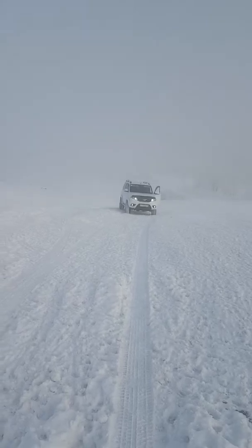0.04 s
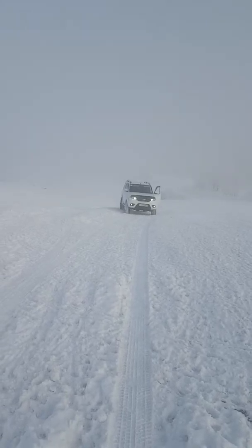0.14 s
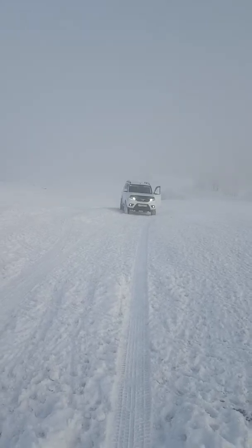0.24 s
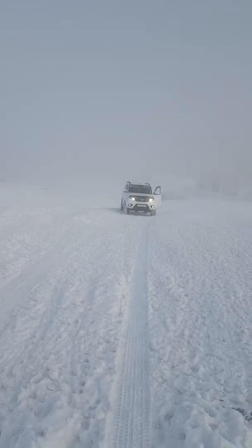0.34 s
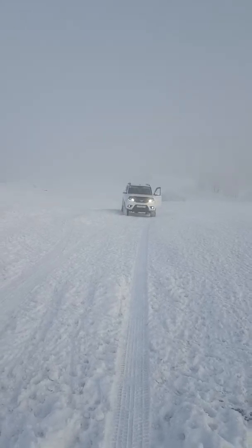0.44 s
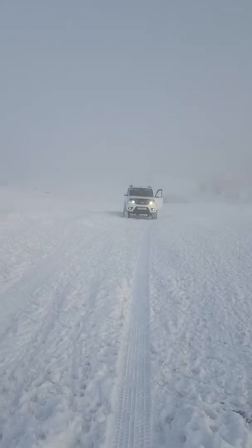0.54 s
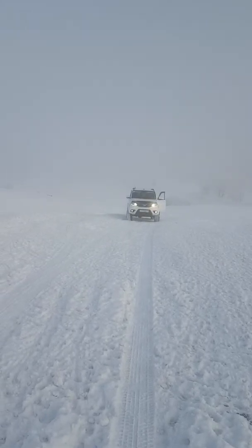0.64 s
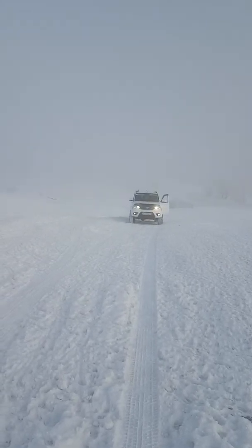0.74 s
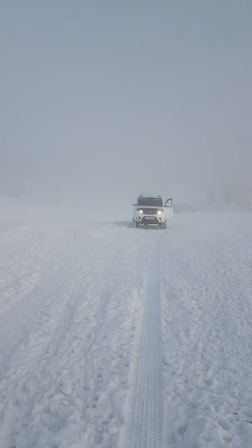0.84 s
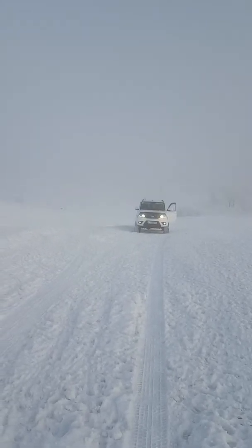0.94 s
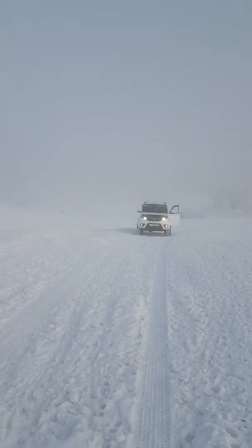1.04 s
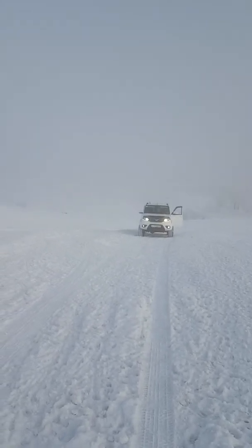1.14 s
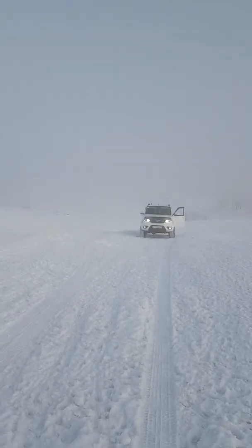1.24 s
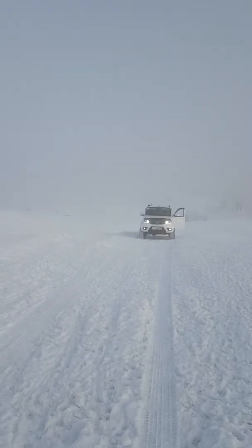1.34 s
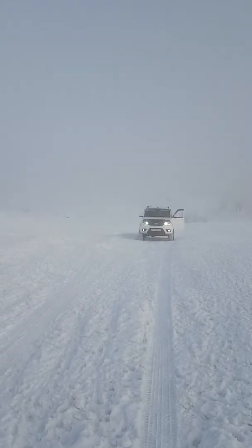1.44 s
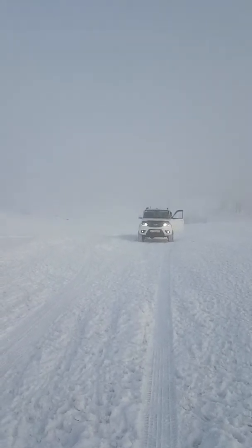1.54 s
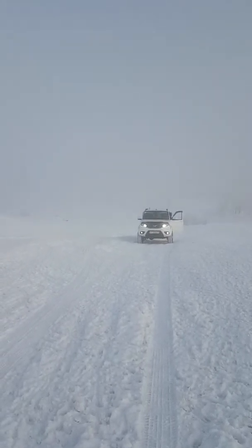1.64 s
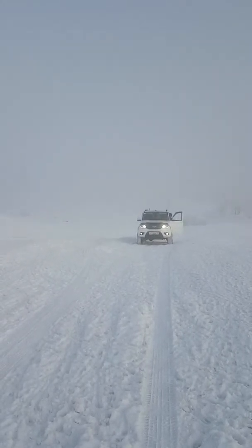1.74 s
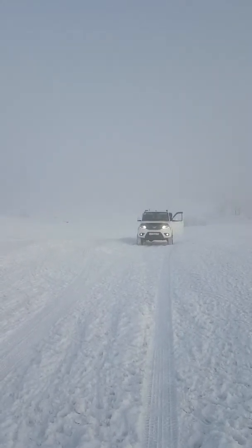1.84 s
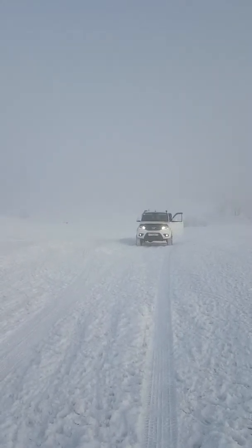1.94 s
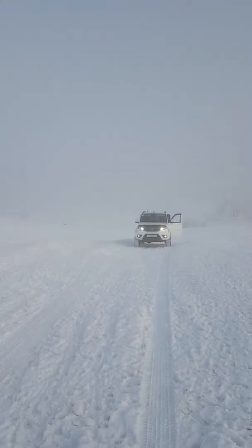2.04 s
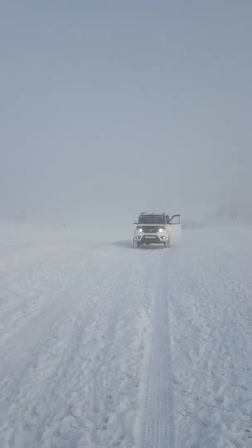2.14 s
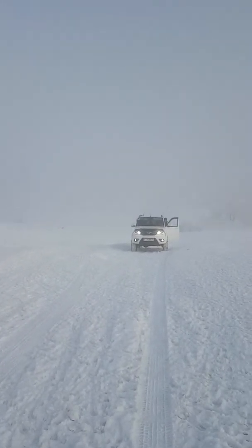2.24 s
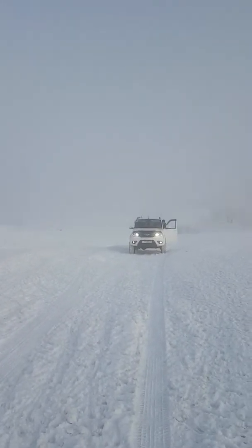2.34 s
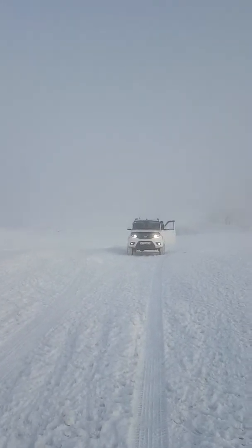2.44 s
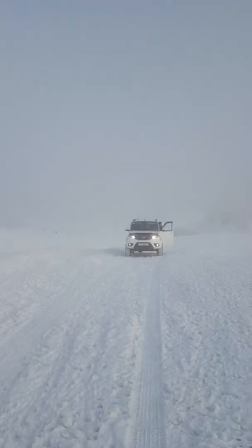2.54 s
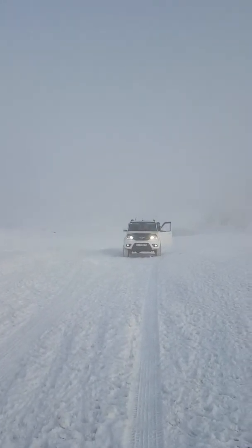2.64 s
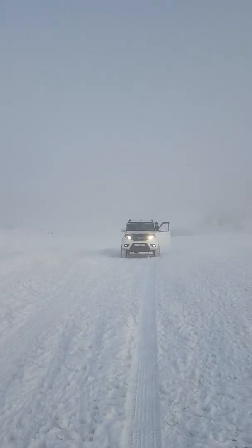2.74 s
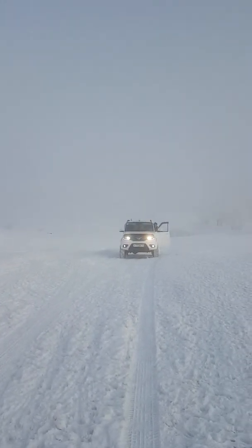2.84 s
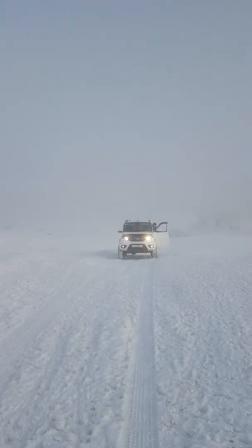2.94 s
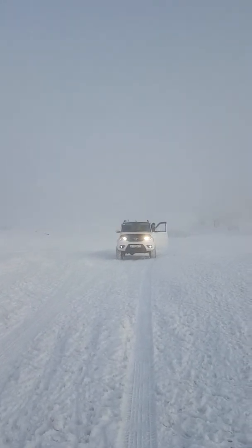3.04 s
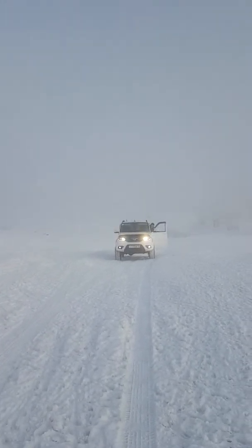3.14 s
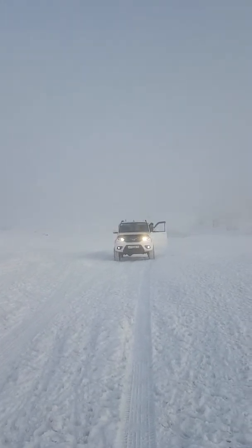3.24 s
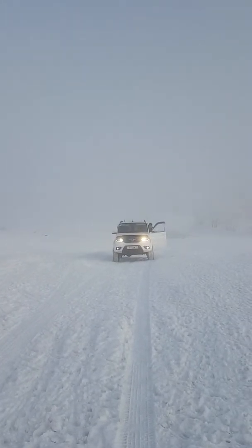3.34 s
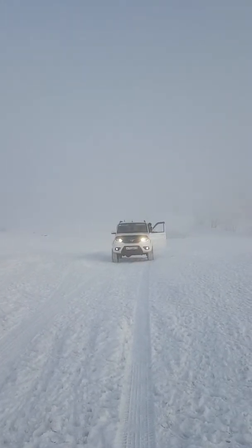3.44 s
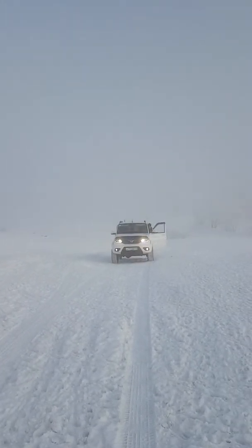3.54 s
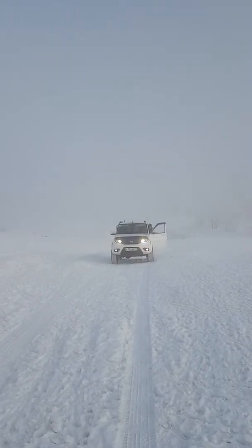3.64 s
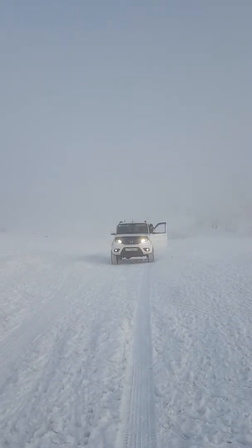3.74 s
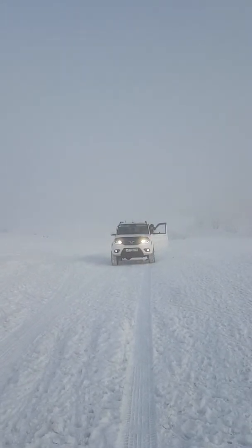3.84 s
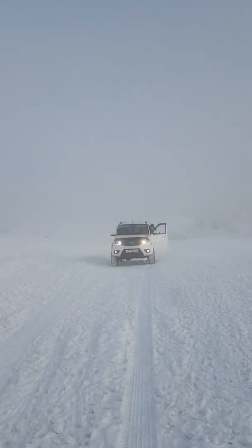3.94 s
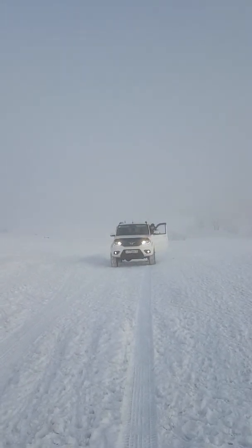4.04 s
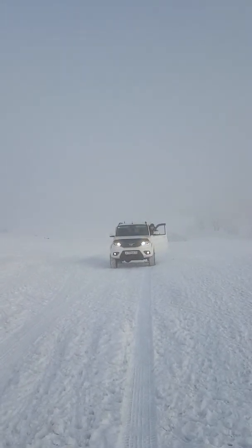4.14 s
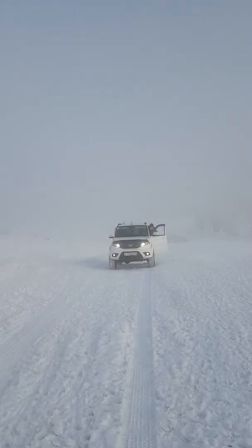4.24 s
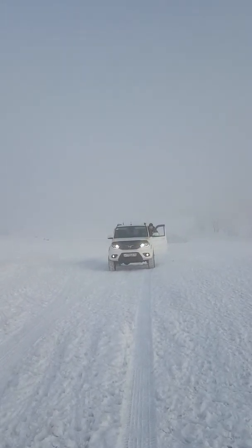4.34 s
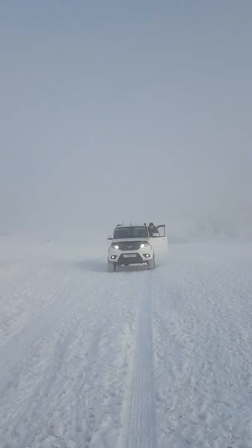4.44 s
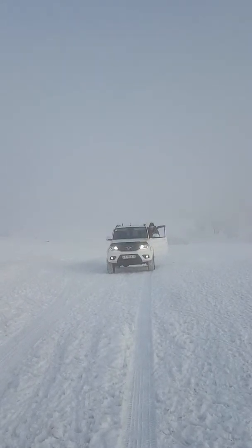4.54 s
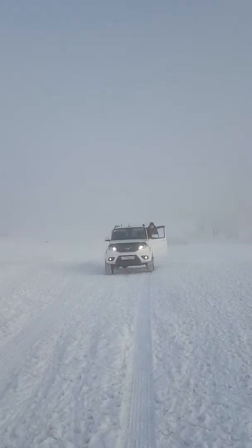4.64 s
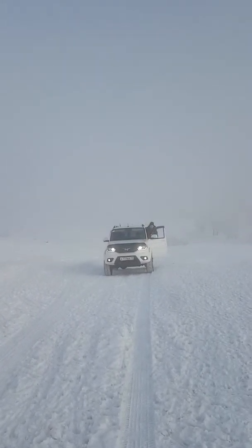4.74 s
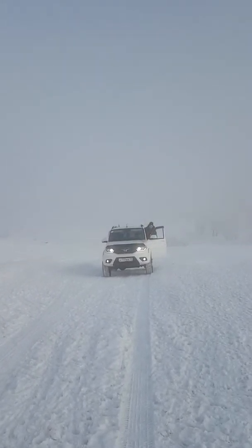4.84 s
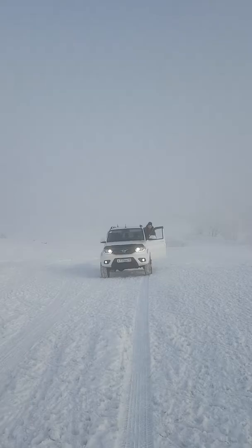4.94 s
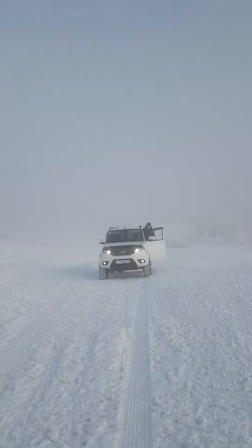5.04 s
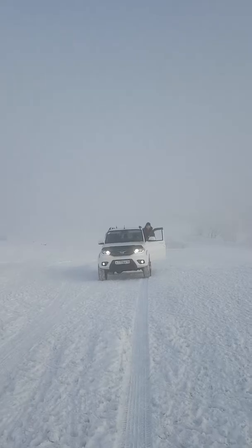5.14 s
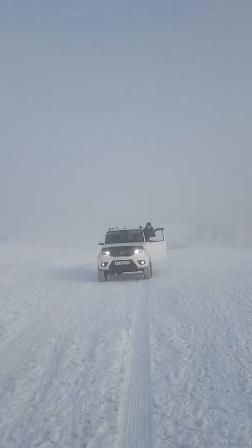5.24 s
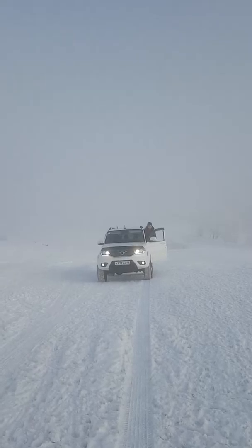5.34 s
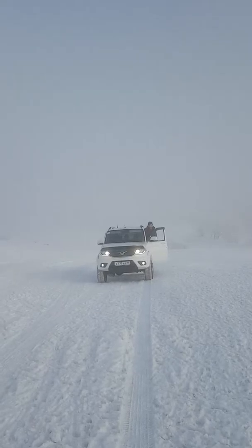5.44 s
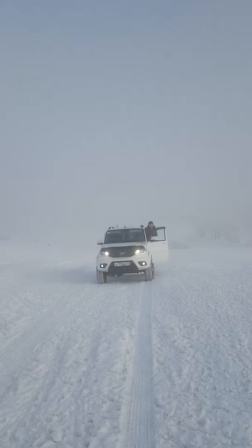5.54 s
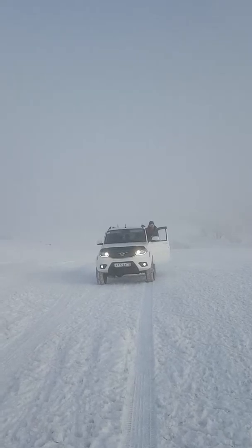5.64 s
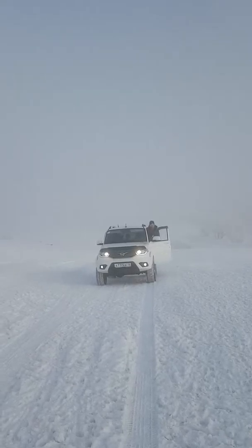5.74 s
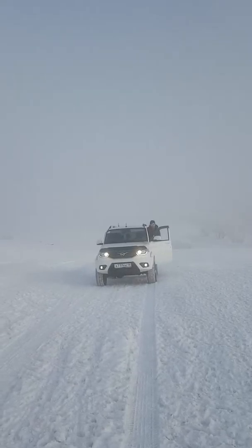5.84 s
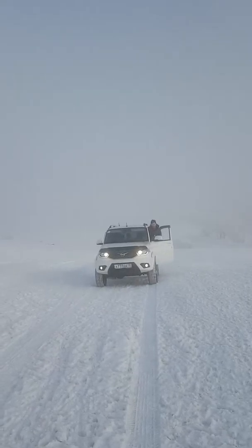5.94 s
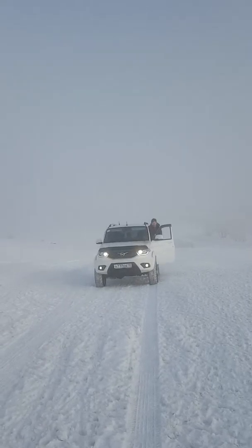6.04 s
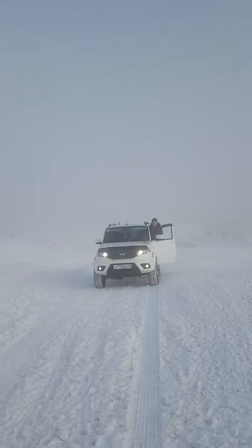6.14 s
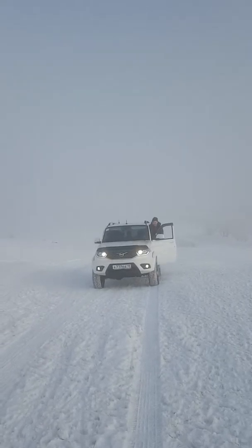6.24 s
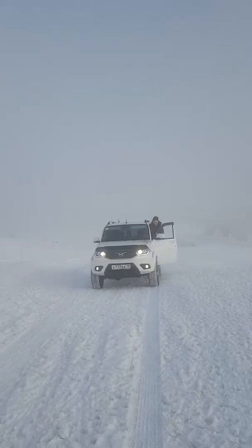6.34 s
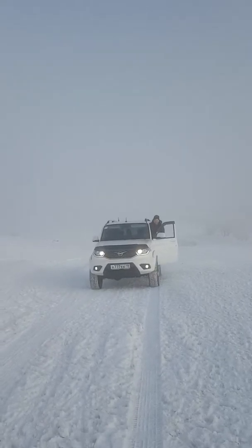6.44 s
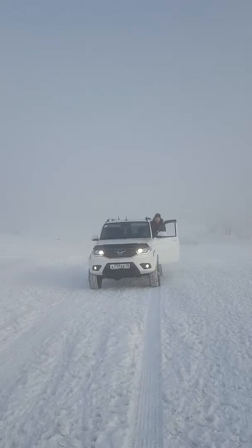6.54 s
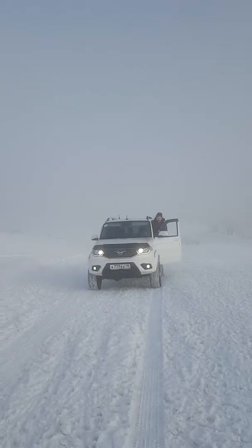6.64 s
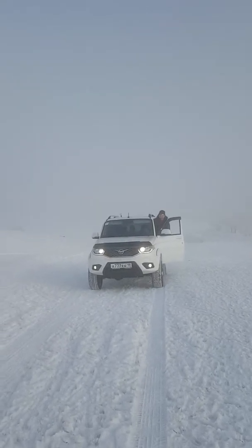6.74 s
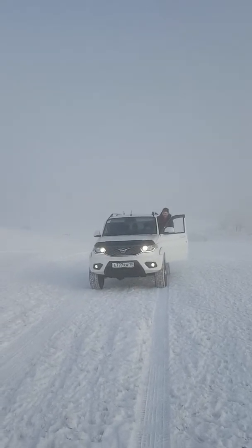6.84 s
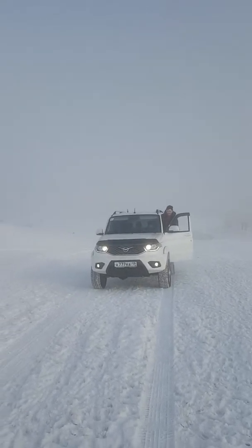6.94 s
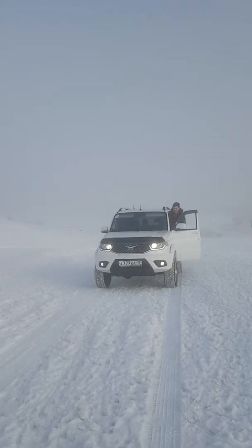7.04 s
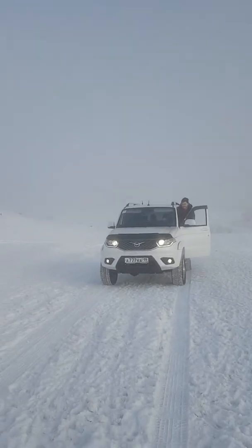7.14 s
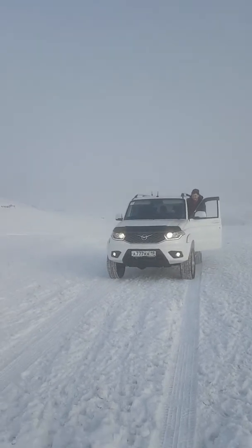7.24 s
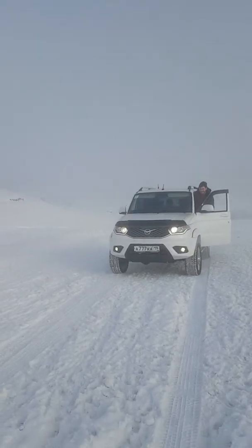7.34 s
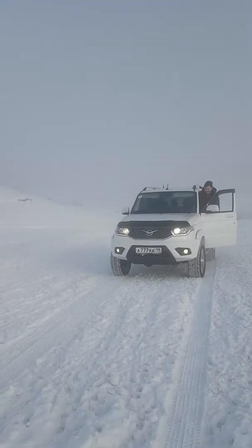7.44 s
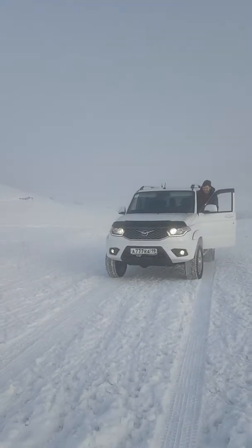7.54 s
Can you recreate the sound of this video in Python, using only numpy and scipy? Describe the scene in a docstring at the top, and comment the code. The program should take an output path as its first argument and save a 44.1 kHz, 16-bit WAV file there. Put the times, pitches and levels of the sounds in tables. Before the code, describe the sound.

Outdoors on an open snowy plain, a distant SUV approaches with a low, pulsing engine hum. The note sags for two seconds, jumps up, then climbs in steps. Tyres thud dully and rumble over packed snow; crunches and short squeaks grow clearer. Close to the microphone come soft rustles and a few small ticks, mostly at the beginning and end. Dry, with no echo.

```python
"""A frozen, snow-covered plain: an SUV crawls closer, its four-cylinder engine dipping, then slowly revving up.
The engine is a set of sine waves locked to the firing rate; fan, valves and belt are shaped noise.
The tyres rumble and crunch in surges, made from random grains of sound, with short squeaks of noise.
Everything from the vehicle's engine bay grows clearer as it nears. Close by, there are rustles and ticks."""
import sys
import numpy as np
from scipy import signal
from scipy.fft import rfft, irfft
from scipy.io import wavfile
from scipy.ndimage import uniform_filter1d, map_coordinates

SR = 44100
rng = np.random.default_rng(int(sys.argv[2]) if len(sys.argv) > 2 else 0)


def to_wav(s):
    """Save 16-bit WAV."""
    ch = np.atleast_2d(s).T  # columns
    pcm = np.round(np.clip(ch, -1, 1) * 32767)  # PCM
    wavfile.write(sys.argv[1], SR, pcm.astype(np.int16))


N = 334410

# In every table of swells, spread_s is the time from the peak until the gain has sunk to 0.61 of it.
# In every spectrum, level_db only sets the balance between pitches; loudness is set elsewhere.

# Left minus right level of the spread-out noises: pitch_hz, difference_db
STEREO_TILT = [(60, -1.1), (250, -1.9), (500, 1), (1000, 1), (1250, 2), (1500, -3), (1850, 0), (2250, -8.5),
               (2700, -7), (3200, -5), (4300, -8), (6200, -4.5), (9000, 0), (15000, 4)]
# How alike left and right are, from 0 (unrelated) to 1 (the same): pitch_hz, likeness
STEREO_LIKENESS = [(150, .999), (300, 0.92), (600, 0.89), (1200, 0.81), (1900, 0.53), (2400, 0.9),
                   (3300, 0.097), (4500, 0.0), (7000, 0.0), (15000, 0.0092)]

# Small sharp ticks nearby, before left-right balance: start_s, level_db, pitch_hz, width_hz
NEARBY_TICKS = [(0.049, -24.5, 1630, 1600), (.261, -48, 3600, 200), (0.822, -27, 1680, 1800),
                (5.867, -36, 15020, 2523), (6.617, -35, 5016, 5028)]
# Something rustles close by, before left-right balance: peak_s, spread_s, thin_hiss_db, gritty_body_db
NEARBY_RUSTLES = [(0.03, 0.062, -71, -51), (0.17, 0.06, -73, -51.5), (0.37, 0.14, -76, -54.5),
                  (0.77, 0.18, -70.5, -50.5), (1.18, 0.13, -75, -58.5), (6.61, 0.027, -63.5, -44),
                  (6.83, 0.068, -56.5, -46), (6.97, 0.098, -56, -47.5), (7.29, .03, -58, -51),
                  (7.39, .035, -60.5, -53), (7.52, .05, -62, -53)]
# Spectrum of the thin rustle and the even hiss: pitch_hz, level_db
RUSTLE_SPECTRUM = [(2000, -26), (7500, 8.5), (9200, -3.5), (11000, 1), (12500, 7), (15700, 7.5)]
# Spectrum of the gritty body of a rustle: pitch_hz, level_db
GRIT_SPECTRUM = [(250, -3), (450, 0), (650, 0), (850, -3.5), (1080, -1.5), (1320, -10.5), (1620, -0.5),
                 (2000, -6), (2500, -11.5), (3500, -14.5), (7000, -20.5), (9500, -33)]

# Faint airy whistle from the vehicle, before left-right balance: time_s, pitch_hz, level_db
WHISTLE_PATH = [(1.15, 7500, -87), (1.22, 7480, -73), (1.4, 7440, -79), (2.3, 7430, -85.5),
                (3.5, 7200, -92), (4.4, 7300, -84.5), (5, 7930, -84), (6.5, 7898, -86)]
# The wheels slip and throw powder: peak_s, spread_s, level_db
WHEEL_SLIP = (2.33, 0.38, -63)
# Spectrum of the thrown powder: pitch_hz, level_db
POWDER_SPECTRUM = [(2000, -2.5), (3000, 3.5), (3600, 2.5), (4800, -2), (6200, -4), (7800, -7), (9000, -20),
                   (12000, -14)]
# Cold snow squeaks under a tyre, before left-right balance: peak_s, level_db, middle_pitch_hz, fall_hz_per_s
SNOW_SQUEAKS = [(2.73, -57.5, 1470, 2990), (3.70, -56, 1080, 700), (3.76, -57, 1480, 700),
                (4.32, -52.5, 1450, 700), (4.53, -57, 1400, 700.4), (5.19, -60, 1510, 700),
                (6.61, -49.5, 1560, 697), (6.71, -47, 1500, 700)]
# Patches of hard crust give way: peak_s, spread_s, level_db
CRUST_BREAKS = [(5.13, 0.044, -60), (7.09, 0.065, -49), (7.25, 0.054, -39.5), (7.53, 0.034, -46)]
# Spectrum of a breaking patch: pitch_hz, level_db
BREAK_SPECTRUM = [(700, -21), (1300, -1), (2100, 5.5), (2850, -15), (3650, -3.5), (4700, -13.5),
                  (6300, -10), (7800, -18), (10000, -34)]

# Steady bed of sound under the tyres: time_s, thud_db, rumble_db
SNOW_BED = [(0.0, -43, -43), (0.45, -41, -43.5), (0.8, -39.5, -42.5), (0.95, -42, -36.5),
            (2.1, -38.5, -36.5), (2.4, -39, -42), (3.3, -54, -35.5), (3.43, -55, -50.5), (3.6, -46, -42),
            (4.7, -61, -38), (7.58, -60, -34.5)]
# A wheel drops through the packed snow: peak_s, spread_s, thud_db, rumble_db
WHEEL_JOLTS = [(0.115, 0.023, -31.5, -40), (0.5, 0.022, -41, -39.5), (0.97, 0.096, -50, -44),
               (1.39, 0.04, -40, -36), (2.24, 0.039, -29, -45), (2.5, 0.031, -32, -38),
               (2.67, 0.033, -35, -35.5), (2.85, 0.079, -31, -40), (3.06, 0.041, -52, -34),
               (3.24, .045, -51, -47), (3.56, 0.057, -45, -35), (3.72, .04, -36.5, -38),
               (3.87, 0.062, -39, -35.5), (4.21, .025, -52, -33), (4.36, 0.058, -37.5, -32),
               (4.59, 0.035, -54, -38), (5.11, 0.05, -33.5, -36), (5.22, 0.051, -38.5, -31.5),
               (5.6, 0.069, -58, -36), (6.12, 0.036, -39, -36), (6.6, .04, -37, -33.5),
               (6.8, .03, -34, -30.5), (6.97, 0.066, -60, -33.5)]
# The tread grinds through the crust: peak_s, spread_s, level_db
CRUNCH_SURGES = [(1.9, .06, -56.5), (2.22, .09, -55.5), (2.79, .075, -56), (3.73, 0.11, -53.5),
                 (4.32, 0.057, -51.5), (4.49, 0.18, -51.5), (5.15, .095, -48.2), (6.62, 0.086, -45),
                 (6.77, 0.12, -47.5), (7.34, 0.26, -48.5), (7.52, 0.045, -46.5)]
# Spectra of deep thud, packing rumble and crust crunch: pitch_hz, level_db
THUD_SPECTRUM = [(40, -57), (65, -13), (88, 6.5), (110, 4.5), (140, 1.5), (200, -13.5), (500, -97)]
RUMBLE_SPECTRUM = [(60, -26), (100, -12), (130, -2.5), (165, -2), (192, 2), (255, -5), (295, -10.5),
                   (350, -23), (450, -39), (2000, -100)]
CRUNCH_SPECTRUM = [(500, -26), (850, -8.5), (1100, 2.5), (1280, -4.5), (1500, 3.5), (1680, 2), (1920, -5),
                   (2850, -9.5), (5000, -27), (10000, -72)]

# Hiss of the drive belt: pitch_hz, width_hz, left_minus_right_db
BELT_HISS = (2390, 400, -6)
# The fan takes hold: middle_of_rise_s, rise_s
FAN_TAKES_HOLD = (2.77, 0.1)
# Spectra of air rush, air roar and valve clatter: pitch_hz, level_db
RUSH_SPECTRUM = [(300, -4.5), (480, -1), (610, 4), (710, -0.5), (810, -3.5), (920, -2), (1100, -12.5),
                 (1300, -17.5), (2500, -41.5)]
ROAR_SPECTRUM = [(160, -22), (260, 3.5), (310, 1), (370, 0), (450, -3), (530, -8), (700, -22), (1500, -60)]
VALVE_SPECTRUM = [(1200, -4), (1850, -2), (2150, 0.5), (2380, -1), (2650, -3), (3200, -8), (4200, -50),
                  (8000, -31.5)]

# Engine speed before smoothing: time_s, firing_rate_hz
ENGINE_SPEED = [(0.0, 50.2), (0.4, 49.38), (0.65, 45.2), (0.8, 42.3), (1.56, 40.5), (1.69, 38.53),
                (2.0, 37.41), (2.45, 54.18), (2.51, 56.06), (3.06, 52.8), (3.4, 51.4), (4.01, 53.35),
                (4.58, 61.6), (4.75, 60.7), (4.81, 58.32), (5.15, 63.3), (5.38, 61.25), (5.59, 66.1),
                (5.81, 63.36), (6.31, 66.14), (6.78, 73.23), (6.99, 75.2), (7.52, 75.2), (7.58, 75.8)]
# Weaker exhaust overtones, against their shared level: multiple_of_firing_rate, level_db
EXHAUST_OVERTONES = [(2.5, -17), (3, -8.0), (3.5, -10.5), (4, -12), (5, -19)]
# Pass band of the exhaust pipe, heard by the overtones: pitch_hz, level_db
PIPE_BAND = [(100, 10), (135, -1.5), (160, 4.5), (185, -2.5), (230, -7), (300, -6.5)]
# The driver presses or lifts the pedal: peak_s, spread_s, octave_change_db
PEDAL_MOVES = [(0.25, 0.044, -18), (2.22, 0.035, 8.5), (4.78, 0.069, -20), (5.2, 0.064, 10.5),
               (6.55, 0.28, 6)]

# In one gear, every firing moves the vehicle the same way forward
START_M, METRES_PER_FIRING = 27.78, 0.045
# Nearness and revs leave levels unchanged at this distance and firing rate
REFERENCE_M, CRUISE_HZ = 20, 55
# The flywheel smooths the speed; load is judged from the climb in firing rate over a longer span
SPEED_SMOOTHING_S, LOAD_SMOOTHING_S = 0.1, 0.2
HEAVY_LOAD_HZ_PER_S = 33  # a climb this fast gives a load of 0.76
RIGHT_LAG_S = 0.00003
CUTOFF_HZ = 15880


def from_db(db):
    """Turn decibels into gain."""
    return 10 ** (np.asarray(db) / 20)


def rms_one(x):
    """Scale to an average power of 1."""
    return x / np.sqrt(np.mean(x ** 2) + 1e-20)


def balance(left_db):
    """Left and right gains: left changes by left_db, right by the opposite."""
    return from_db([[left_db], [-left_db]])


def in_time(rows):
    """Read each column of a timed table at every sample, with straight lines between rows."""
    time_s, *columns = np.transpose(rows)
    return [np.interp(np.arange(N) / SR, time_s, column) for column in columns]


def at_bins(points):
    """Read a table at every Fourier bin, with straight lines over log frequency."""
    hz, value = np.transpose(points)
    bin_hz = np.arange(N // 2 + 1) * SR / N
    return np.interp(np.log(bin_hz + 1), np.log(hz), value)


def drift(rate_hz):
    """Random wander of average power 1, heading to a new value rate_hz times a second."""
    knots = rng.standard_normal(N // 20)
    position = np.arange(N) / SR * rate_hz + 2
    return rms_one(map_coordinates(knots, [position], order=1, mode="wrap"))


def bell(peak_s, spread_s):
    """A smooth swell of height 1 around a moment."""
    distance = (np.arange(N) / SR - peak_s) / spread_s
    return np.exp(-.5 * np.minimum(distance ** 2, 100))


def swells(rows, column=2):
    """Joint gain of a table of swells: their powers add."""
    return np.sqrt(sum((from_db(row[column]) * bell(row[0], row[1])) ** 2 for row in rows))


def grains(per_s, spread_db, smooth):
    """Two trains of random snow fractures of uneven size, over a share of smooth hiss."""
    born = rng.random((2, N)) < per_s / SR
    sizes = from_db(spread_db * np.minimum(rng.exponential(1, (2, N)), 4))
    sign_noise, hiss = rng.standard_normal((2, 2, N))
    return rms_one(born * sizes * np.sign(sign_noise)) + smooth * hiss


def narrow_noise(hz, width_hz):
    """An airy tone: two random wanders ride on a sine and a cosine, giving a narrow band of noise."""
    angle = 2 * np.pi * np.cumsum(hz) / SR
    return rms_one(drift(width_hz) * np.sin(angle) + drift(width_hz) * np.cos(angle))


def radiate(pair, spectrum, ringing=0.0, ring_s=0.015):
    """Colour two unrelated signals, spread them over left and right, and even out the power of their mix."""
    # Short random reflections off the body and ground
    t = np.arange(SR // 25) / SR
    scatter = rng.standard_normal((2, len(t))) * np.exp(-t / ring_s)
    panels = 1 + ringing * rfft(rms_one(scatter) / np.sqrt(len(t)), N)
    mid, side = rfft(pair) * panels * from_db(at_bins(spectrum))
    # The shared part goes equally to both sides, the other part with opposite signs
    alike = np.clip(at_bins(STEREO_LIKENESS), -1, 1)
    sign = np.array([[1], [-1]])
    both = np.sqrt(1 + alike) * mid + sign * np.sqrt(1 - alike) * side
    bin_hz = np.arange(N // 2 + 1) * SR / N
    lag = np.exp(1j * np.pi * sign * RIGHT_LAG_S * bin_hz)
    tilt = from_db(sign * at_bins(STEREO_TILT) / 2)
    out = irfft(both * lag * tilt, N)
    # Hold the mix of both sides at power 1 over every tenth of a second
    power = uniform_filter1d(out.mean(axis=0) ** 2, SR // 10)
    return out / np.sqrt(power + 1e-20)


def drive():
    """Engine speed sets firing rate (Hz), nearness (dB), revs (dB) and load (-1 coasting to 1 pulling)."""
    rate_hz = uniform_filter1d(in_time(ENGINE_SPEED)[0], int(SPEED_SMOOTHING_S * SR))
    firings = np.cumsum(rate_hz) / SR
    distance_m = np.maximum(START_M - METRES_PER_FIRING * firings, 1)
    nearness_db = 20 * np.log10(REFERENCE_M / distance_m)
    revs_db = 20 * np.log10(rate_hz / CRUISE_HZ)
    climb_hz_per_s = uniform_filter1d(np.gradient(rate_hz) * SR, int(LOAD_SMOOTHING_S * SR))
    load = np.tanh(climb_hz_per_s / HEAVY_LOAD_HZ_PER_S)
    return rate_hz, nearness_db, revs_db, load


def follow(motion, db, near=1.0, revs=0.0, load_db=0.0):
    """Gain that follows shares of nearness and revs, plus load_db times the load."""
    _, nearness_db, revs_db, load = motion
    return from_db(db + near * nearness_db + revs * revs_db + load_db * load)


def fan_grip():
    """0 while the fan idles, 1 once it has taken hold."""
    middle_s, rise_s = FAN_TAKES_HOLD
    return np.clip((np.arange(N) / SR - middle_s) / rise_s + .5, 0, 1)


def ticks():
    """Each tick is one impulse into a broad, quickly dying resonance; a wider one dies sooner."""
    out, t = np.zeros(N), np.arange(SR // 20) / SR
    for start_s, db, hz, width_hz in NEARBY_TICKS:
        at = int(start_s * SR)
        decay = np.exp(-np.pi * width_hz * t / 2)
        out[at:at + len(t)] += from_db(db) * decay * np.sin(2 * np.pi * hz * t)
    return out * balance(-2)


def rustles(floor_db=-72.5):
    """Swells of fine grains over a coarser gritty body come and go close by, over an even hiss."""
    thin_grains = grains(per_s=9000, spread_db=3.0, smooth=1.2)
    thin = swells(NEARBY_RUSTLES) * radiate(thin_grains, RUSTLE_SPECTRUM, ringing=.25)
    grit_grains = grains(per_s=1500, spread_db=3.0, smooth=0.58)
    grit = swells(NEARBY_RUSTLES, column=3) * radiate(grit_grains, GRIT_SPECTRUM)
    white = rng.standard_normal((2, N))
    hiss = rms_one(irfft(rfft(white) * from_db(at_bins(RUSTLE_SPECTRUM)), N))
    return thin * balance(-7.0) + grit + from_db(floor_db) * hiss


def whistle(width_hz=280, lower_hz=6250, lower_db=-80.0):
    """Thin bands of hiss: one wanders in pitch, a steady lower one joins with the fan."""
    hz, db = in_time(WHISTLE_PATH)
    lower = fan_grip() * from_db(lower_db) * narrow_noise(np.full(N, lower_hz), width_hz)
    wandering = from_db(db) * narrow_noise(hz, width_hz)
    return (wandering + lower) * balance(-2)


def powder(motion, clump_db=0.9):
    """Dry crystals hiss off the tread as fine grains, louder as they near and when the wheels slip."""
    crystals = grains(per_s=5000, spread_db=3.5, smooth=1.0) * from_db(clump_db * drift(60))
    steady = follow(motion, db=-64.5, near=1.52, load_db=-1.3)
    thrown = np.hypot(steady, swells([WHEEL_SLIP]))
    return thrown * radiate(crystals, POWDER_SPECTRUM, ringing=0.35)


def squeaks(spread_s=0.044, width_hz=140):
    """Crystals rub against each other in a short, rough note that sinks as the snow packs."""
    out = 0
    for peak_s, db, middle_hz, fall_hz_per_s in SNOW_SQUEAKS:
        t = np.clip(np.arange(N) / SR - peak_s, -.5, .5)
        note = narrow_noise(middle_hz - fall_hz_per_s * t, width_hz)
        out = out + from_db(db) * bell(peak_s, spread_s) * note
    return out * balance(-2.5)


def breaks(clump_db=2.0):
    """A hard patch shatters in a short, bright shower of coarse grains."""
    shards = grains(per_s=2000, spread_db=3.5, smooth=0.3) * from_db(clump_db * drift(120))
    return swells(CRUST_BREAKS) * radiate(shards, BREAK_SPECTRUM)


def tyres(motion, clump_db=1.3):
    """Snow collapses under the tread in dull jolts, and its crust breaks in surges of clumped grains."""
    thud_db, rumble_db = in_time(SNOW_BED)
    # Steady bed and separate swells add in power
    thud = np.hypot(from_db(thud_db), swells(WHEEL_JOLTS))
    rumble = np.hypot(from_db(rumble_db), swells(WHEEL_JOLTS, column=3))
    crunch = np.hypot(follow(motion, db=-57.0, near=0.68, revs=0.73), swells(CRUNCH_SURGES))
    deep = thud * radiate(grains(per_s=400, spread_db=2.0, smooth=0.59), THUD_SPECTRUM)
    packing = rumble * radiate(grains(per_s=900, spread_db=-0.5, smooth=0.43), RUMBLE_SPECTRUM)
    crust = grains(per_s=1200, spread_db=1.0, smooth=0.85) * from_db(clump_db * drift(55))
    return deep + packing + crunch * radiate(crust, CRUNCH_SPECTRUM)


def belt(motion, waver_db=2.7):
    """The drive belt hisses unevenly in a narrow band that stands out with higher revs and nearness."""
    hz, width_hz, left_minus_right_db = BELT_HISS
    hiss = narrow_noise(np.full(N, hz), width_hz) * from_db(waver_db * drift(7))
    return follow(motion, db=-69.0, near=1.7, revs=1.7) * hiss * balance(left_minus_right_db / 2)


def engine_bay(motion, idle_fan_db=-4.0, idle_roar_db=-6.0, throb=0.14, tapping=0.21):
    """Air rushes through fan and grille as noise, and valve gear chatters in step with the firings."""
    beat = np.cos(2 * np.pi * np.cumsum(motion[0]) / SR)
    idle = 1 - fan_grip()
    rushing = rng.standard_normal((2, N)) * (1 + throb * beat)
    air = from_db(idle_fan_db * idle) * radiate(rushing, RUSH_SPECTRUM)
    chatter = grains(per_s=3000, spread_db=2.5, smooth=1.0) * (1 + tapping * beat)
    valves = radiate(chatter, VALVE_SPECTRUM, ringing=0.43)
    roar = from_db(idle_roar_db * idle) * radiate(rng.standard_normal((2, N)), ROAR_SPECTRUM)
    # Soft snow swallows sound over a long path, so air and roar grow faster than distance alone gives
    air_level = follow(motion, db=-52.5, near=1.92, load_db=0.5)
    roar_level = follow(motion, db=-52.5, near=2.0)
    valve_level = follow(motion, db=-57.0, near=0.56, revs=0.94, load_db=4.0)
    return air_level * air + roar_level * roar + valve_level * valves


def exhaust(motion, low_cut_hz=51.0, steepness=16.0, pedal_share=0.14, waver_db=0.52, rough_db=3.0):
    """Sines at the firing rate, its octave and weaker wavering overtones; the octave barks under load."""
    rate_hz = motion[0]
    pedal_db = sum(db * bell(peak_s, spread_s) for peak_s, spread_s, db in PEDAL_MOVES)
    angle = 2 * np.pi * np.cumsum(rate_hz) / SR
    # The firing tone gets lost at low revs
    low_cut = np.sqrt(1 + (low_cut_hz / rate_hz) ** steepness)
    firing_level = follow(motion, db=-35.0, near=0.75, load_db=3.5) / low_cut
    out = firing_level * from_db(waver_db * drift(16) + pedal_share * pedal_db) * np.sin(angle)
    octave_level = follow(motion, db=-39.5, near=1.0, revs=0.14, load_db=3.5) * from_db(pedal_db)
    out += octave_level * np.sin(2 * angle - np.pi / 2)
    shared_level = follow(motion, db=-36.5, near=0.86, load_db=0.5)
    for multiple, db in EXHAUST_OVERTONES:
        pipe_db = np.interp(multiple * rate_hz, *np.transpose(PIPE_BAND))
        level_db = db + pipe_db + rough_db * drift(11)
        phase = multiple * angle + 0.39 * drift(9.8) + 2 * np.pi * rng.random()
        out += shared_level * from_db(level_db) * np.sin(phase)
    return out * balance(-.4)


def scene():
    """Open snow gives no echo: all sources are added together dry."""
    motion = drive()
    nearby = rustles() + ticks()
    snow = powder(motion) + squeaks() + breaks() + tyres(motion)
    vehicle = whistle() + belt(motion) + engine_bay(motion) + exhaust(motion)
    return nearby + snow + vehicle


def record(dry):
    """A steep low-pass filter removes the very highest pitches."""
    low_pass = signal.ellip(12, .1, 80, CUTOFF_HZ, fs=SR, output="sos")
    return signal.sosfilt(low_pass, dry)


dry = scene()
out = record(dry)
to_wav(out)
```